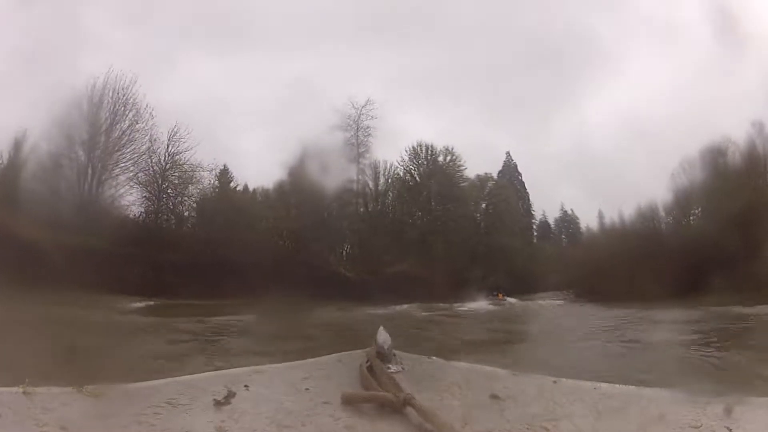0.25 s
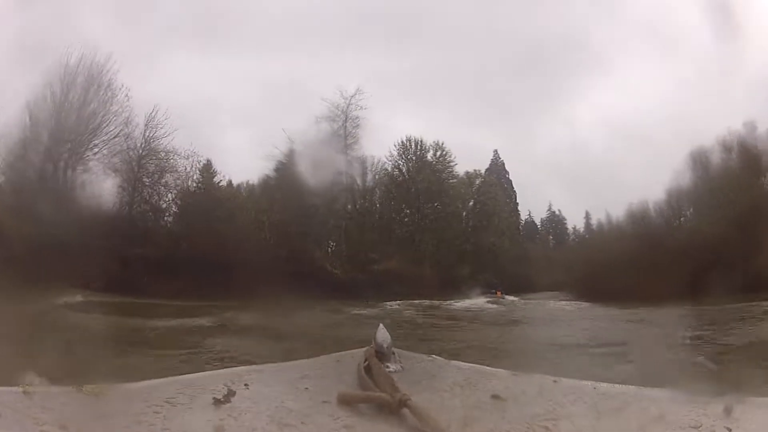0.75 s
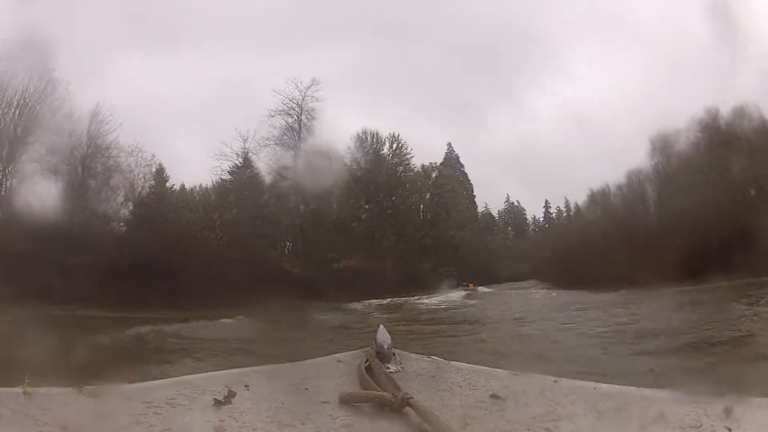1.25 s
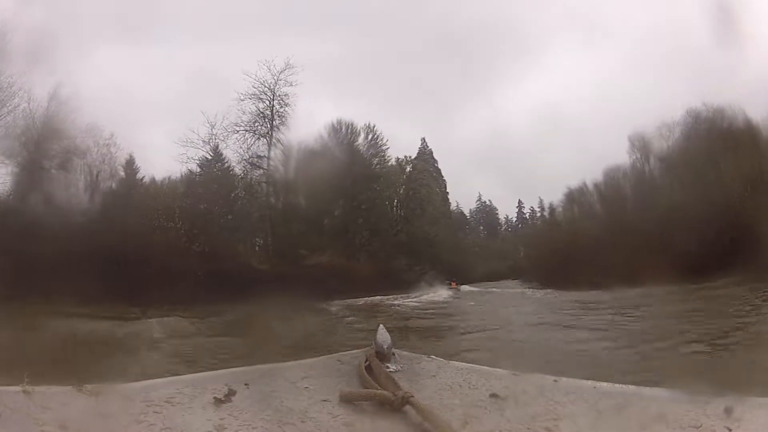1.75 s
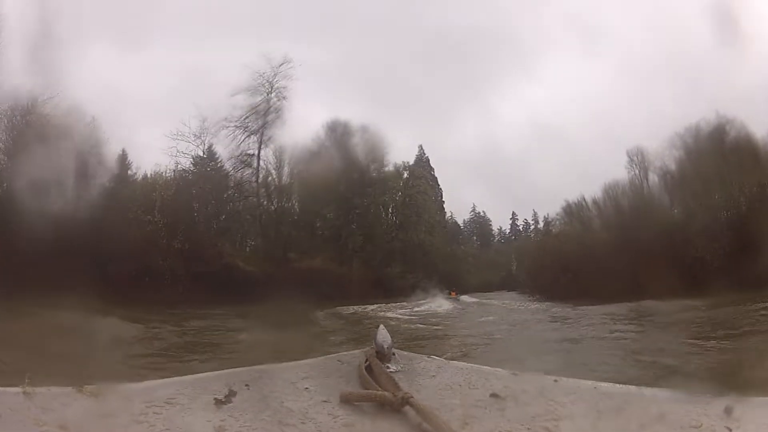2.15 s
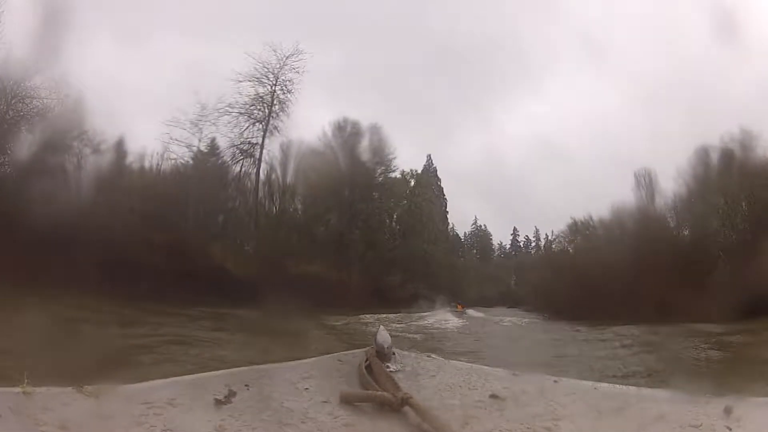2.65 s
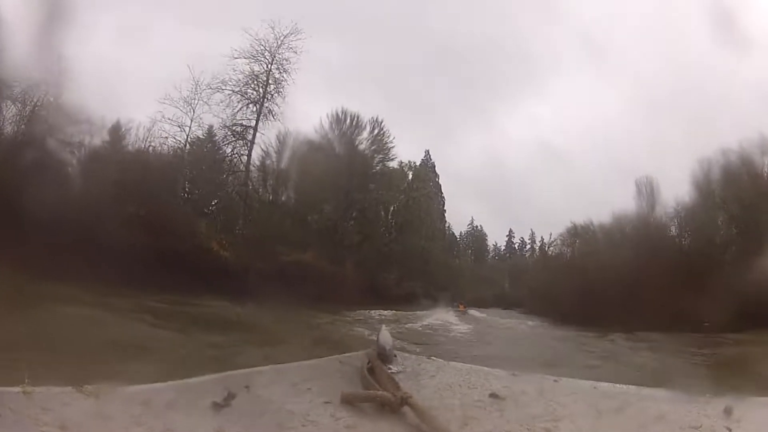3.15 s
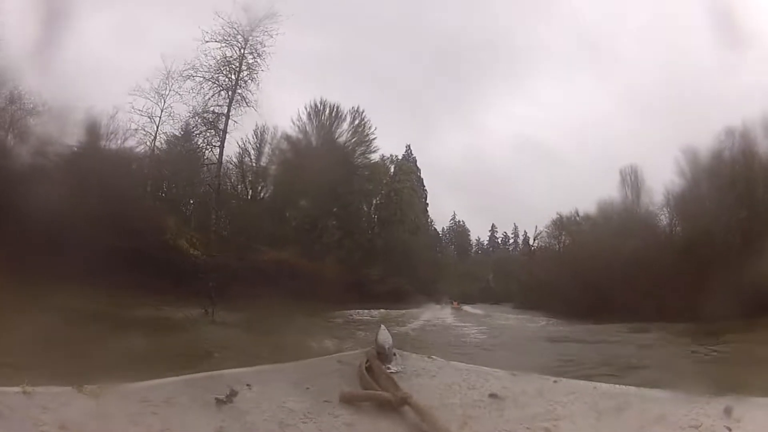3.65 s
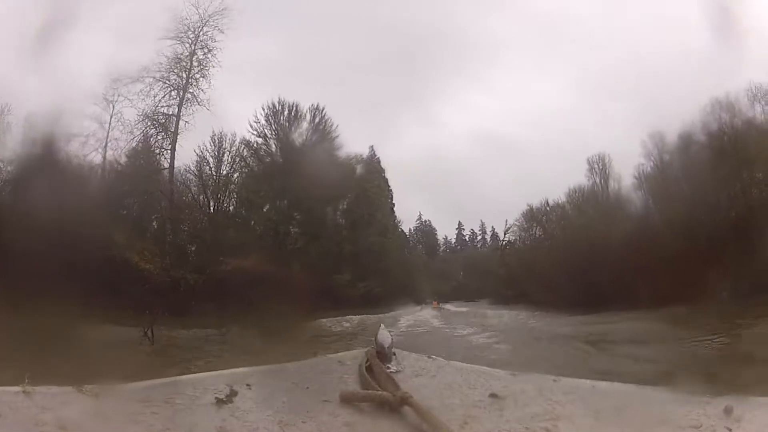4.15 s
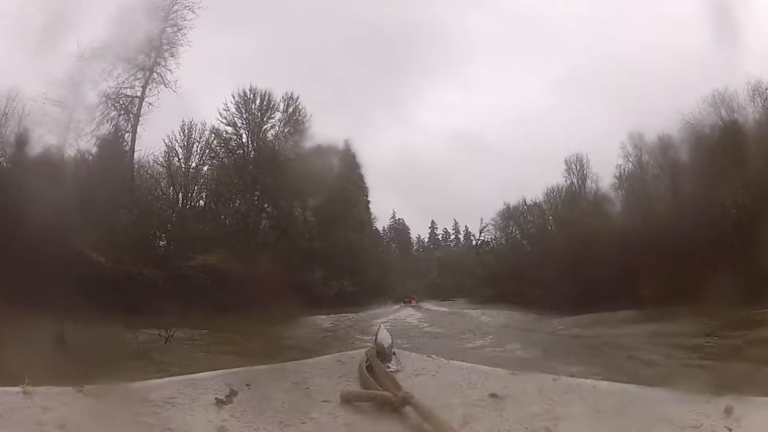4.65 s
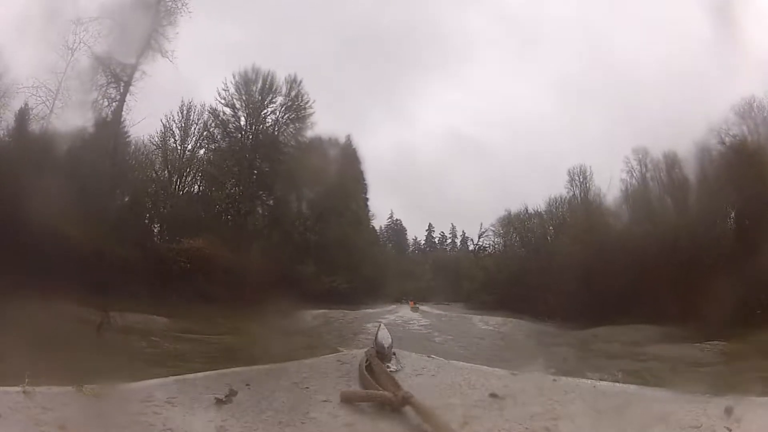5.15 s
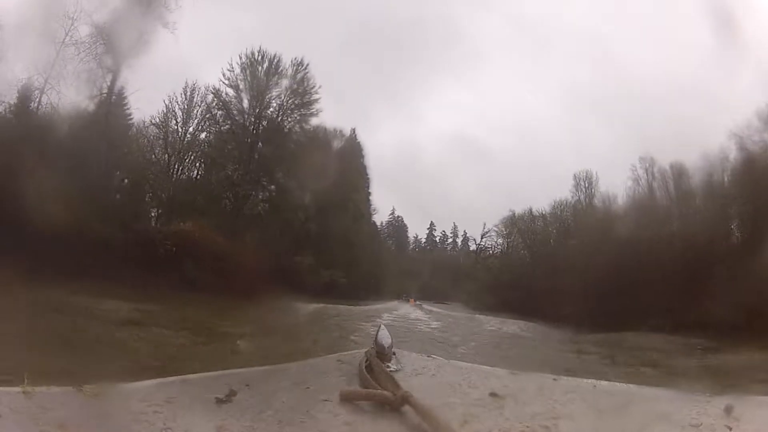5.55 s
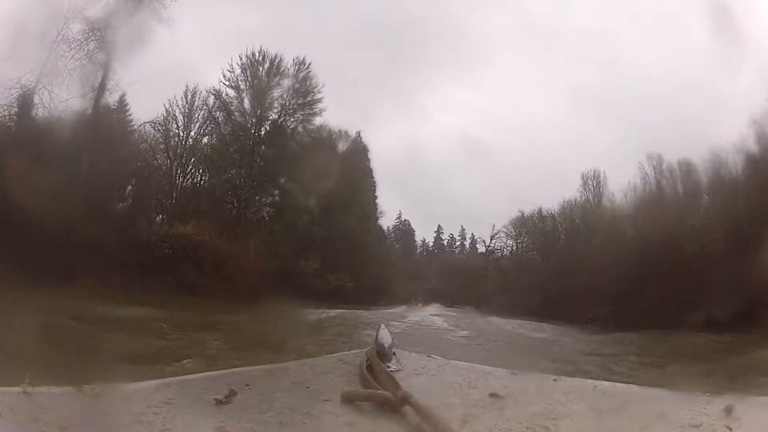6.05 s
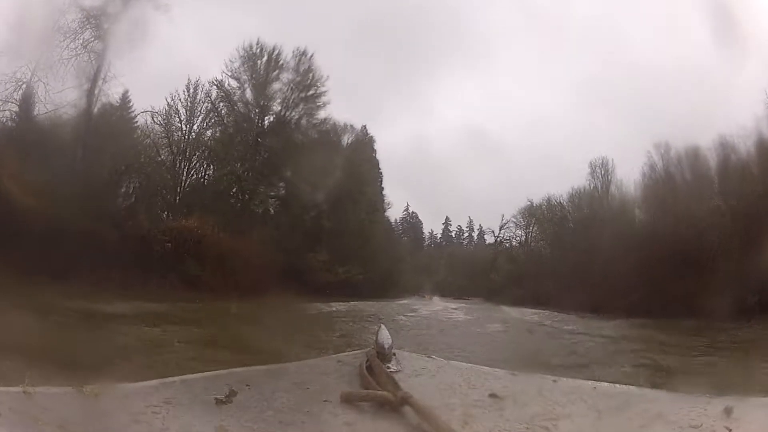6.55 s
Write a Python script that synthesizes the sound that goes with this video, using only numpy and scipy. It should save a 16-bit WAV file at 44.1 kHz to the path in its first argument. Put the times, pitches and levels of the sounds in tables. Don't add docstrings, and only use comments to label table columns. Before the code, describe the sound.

Close on the bow of a small motorboat on a river, a shut-in microphone picks up constant rushing spray and a humming engine. The note climbs, suddenly sags, rises into a steady hollow boom with a rattling loose part, then falls to lumpy throbbing with heavier hull thuds, starting to climb again at the end. Water drops tap the casing throughout.

```python
import sys
import numpy as np
from scipy import signal
from scipy.io import wavfile
from scipy.ndimage import uniform_filter1d

SR = 44100
rng = np.random.default_rng(int(sys.argv[2]) if len(sys.argv) > 2 else 0)


def amplitude_ratio(level_db):
    exponent = np.asarray(level_db, float) / 20
    return 10 ** exponent


def wav_out(sig):
    wavfile.write(sys.argv[1], SR, np.round(np.clip(np.atleast_2d(sig).T, -1, 1) * 32767).astype(np.int16))


N = 299439
TIME = np.arange(N) / SR

# t/s, shaft speed f/Hz, effort level/dB
THROTTLE = [(0.0, 50.65, -3), (0.45, 62.93, -1), (1.3, 65.33, -5), (1.44, 68.85, 0), (1.62, 83, 0.5),
            (1.77, 85.6, -10), (1.92, 35.83, -21), (2.32, 55.6, -6), (2.74, 66.9, 1), (3.18, 68.4, 3),
            (3.54, 66.46, -0.5), (4.3, 66.82, 2), (4.5, 63.47, 0), (5.25, 61.95, 3), (5.53, 30.14, 11),
            (5.93, 27.1, 6), (6.08, 33.3, 2), (6.79, 45.75, 5.5)]
# multiple of shaft speed, level/dB, waver/dB
MAIN_ORDERS = [(3, -0.44, 2.2), (4, -8, 2.5)]
# f/Hz, level/dB
BOOM = [(160, -38), (187, -35), (195, -23), (204, -11.5), (216, -17.5), (232, -20.5), (246, -21),
        (265, -37)]
# shaft speed f/Hz, level/dB
SHAFT = [(28, -17.5), (35, -29.5), (55, -38.5), (64, -33.5), (86, -47)]
PICK_UP = 6.03, 0.2, 6, 0.6, -16


def throttle():
    speed, effort_db = columns(THROTTLE)
    glide_s = 0.034
    speed = uniform_filter1d(speed, int(glide_s * SR))
    coast_db_per_hz_s = 0.23
    effort_db = effort_db + coast_db_per_hz_s * np.minimum(np.gradient(speed) * SR, 0)
    orders_db = [effort_db + db + read(BOOM, k * speed) for k, db, _ in MAIN_ORDERS]
    yield_db = 1.26 * np.maximum(orders_db[0] + 21, 0)
    shaft_db = read(SHAFT, speed) - np.minimum(yield_db, 10.5)
    start, swell, end, fade, top_db = PICK_UP
    not_yet_db = 30 * np.maximum(1 - (TIME - start) / swell, 0)
    gone_db = 10 * np.maximum((TIME - end) / fade, 0)
    pick_up_db = top_db - not_yet_db - gone_db
    return speed, effort_db, [shaft_db, *orders_db, pick_up_db]


# multiple of shaft speed, level/dB
SIDE_ORDERS = [(1.5, -76), (2, -44), (3.5, -56), (5, -39), (6, -39), (7, -41), (8, -40.5), (9, -40),
               (10, -44)]
# f/Hz, level/dB
CARRY = [(60, -2), (170, -5), (210, 6.5), (260, -1), (290, -8.5), (350, -11), (420, -17), (480, -1),
         (620, 0), (800, -31)]


def engine(turns, speed, effort_db, levels_db):
    wavers_db = [1.2] + [waver for *_, waver in MAIN_ORDERS] + [1.5]
    main = 0
    for k, db, waver in zip((1, 3, 4, 6), levels_db, wavers_db):
        main = main + amplitude_ratio(db + waver * drift(15)) * np.sin(2 * np.pi * k * turns)
    weak = 0
    for k, db in SIDE_ORDERS:
        level_db = db + read(CARRY, k * speed) + 2.5 * drift(12)
        weak = weak + amplitude_ratio(level_db) * np.sin(2 * np.pi * (k * turns + rng.random()))
    change_hz_s = abs(uniform_filter1d(np.gradient(speed) * SR, size=4000))
    blur_db = np.minimum(0.033 * change_hz_s, 12)
    return np.sqrt(2) * (main + amplitude_ratio(effort_db - blur_db) * weak)


# t/s, level/dB, ring f/Hz
THROBS = [(1.933, -7, 206.5), (1.995, -7, 225.5), (2.067, -7, 236), (2.104, -4, 240), (2.186, -14, 184),
          (5.354, -16, 246), (5.4, -0.5, 229), (5.468, -11, 215.4), (5.51, -3, 224.8), (5.555, 2, 218),
          (5.656, -3, 235), (5.724, 10, 235), (5.77, 8.5, 243), (5.855, 2.5, 220), (5.892, -19, 251.5),
          (5.954, -19, 210), (6.07, 7.5, 211), (6.104, 9.5, 216.8), (6.147, 4, 216.2), (6.189, 3, 210),
          (6.228, -4, 213), (6.27, -8, 228.8), (6.32, 7, 226), (6.388, 6.5, 228.2), (6.461, 1.5, 227),
          (6.499, 1, 241), (6.538, 0, 238.3), (6.595, 0, 255.7), (6.647, -6.5, 250), (6.756, -13, 222)]


def throbs():
    return rings(THROBS, lead=0.01244, length=0.052, gain_db=-8.5)


# f/Hz, width/Hz, level/dB
PANELS = [(168, 21, -35), (199.6, 14.4, 0), (226, 13.4, 4), (250, 25.8, -5), (329.7, 7.9, -10)]


def hull(turns, shake_db, thud_db):
    strength = amplitude_ratio(3.3 * rng.standard_normal(500))[turns.astype(int)]
    blows = (1.05 + strength * np.exp(-(turns % 1) / 0.94)) * rng.standard_normal(N)
    panels = 0
    for k, (hz, width, db) in enumerate(PANELS):
        ring = resonate(resonate(blows, hz, width), hz, 2.4 * width)
        panels = panels + (-1) ** k * amplitude_ratio(db) * ring
    thud = evened(band(blows, 75, 209))
    thud += amplitude_ratio(-11.5) * evened(band(blows, 2.5, 55))
    thud += evened(band(blows, 382, 1270))
    thud += amplitude_ratio(-1.5) * evened(resonate(blows, 734, 37))
    thud += amplitude_ratio(-13.5) * evened(resonate(blows, 595, 16))
    return amplitude_ratio(shake_db + 2.0) * evened(panels) + amplitude_ratio(thud_db - 4.27) * thud


# t/s, level/dB, length/s
SLAMS = [(0.0, -30, 0.04), (1.442, -29, .04), (1.987, -50, 0.011), (2.116, -23.5, 0.049),
         (2.243, -33, 0.065), (3.04, -36, 0.045), (3.21, -42, 0.056), (3.4, -29, 0.034), (3.95, -45, 0.088),
         (5.282, -32, 0.034), (5.607, -27, 0.05), (5.43, -56, 0.029), (5.77, -20, 0.038),
         (5.919, -20, 0.034), (6.56, -24, 0.031)]


def chop(chop_db):
    slams = sum(amplitude_ratio(db) * np.exp(-((TIME - s) / length) ** 2) for s, db, length in SLAMS)
    thud = amplitude_ratio(chop_db - 8 + drift(6.9)) + slams
    return chop_db + drift(7.9), 20 * np.log10(thud)


# f/Hz, level/dB per Hz
RUSH = [(280, -8), (330, -32.5), (420, -33), (500, -20), (650, -16), (980, -5), (1300, -10.5),
        (1450, -20.5), (1870, 3.5), (2250, -3), (2500, -12.5), (2950, -32), (4150, -43), (5900, -33.5)]
# f/Hz, width/Hz, level/dB
CASE = [(702, 18, 5.5), (737, 69, 7), (1016, 40.4, 12.5), (1143, 66, 6), (1790, 290, 6), (1910, 170, -3.5),
        (2190, 154, -10.5), (3510, 385, 15), (3792, 295, 17)]


def water(rush_db):
    flicker_db = 1.02 * drift(81) + 1.0 * drift(520) + 0.29 * drift(49)
    spray = rng.standard_normal(N) * amplitude_ratio(flicker_db)
    hz, _, z = signal.stft(spray, SR, nperseg=1024, noverlap=768)
    colour_db = read(RUSH, hz) - 30 * (hz < 270)
    for f0, width, db in CASE:
        colour_db = colour_db + db / (1 + (2 * (hz - f0) / width) ** 2)
    patches = uniform_filter1d(rng.standard_normal(z.shape), 10, 0)
    patches = evened(uniform_filter1d(patches, 10, 1))
    coloured = z * amplitude_ratio(colour_db[:, None] + 0.67 * patches)
    rush = signal.istft(coloured, SR, nperseg=1024, noverlap=768)[1][:N]
    return amplitude_ratio(rush_db + 2.8) * evened(rush)


# t/s, level/dB, ring f/Hz
DROPS = [(0.0348, -10, 1736), (0.4783, -9, 1870), (0.8684, -3.5, 1854), (1.111, -8, 1918),
         (1.2858, -18, 1880), (1.505, -3, 1850), (1.6724, -1.5, 1890), (1.9823, -12.5, 1784),
         (2.1266, -2, 1835), (2.2023, -7, 1796), (2.3665, -1, 1877), (2.4074, -2, 1910),
         (2.7342, -16, 1876), (2.8429, -11, 1910), (3.6805, -2.5, 1750), (3.802, -12, 1973),
         (4.0353, -5, 1790), (4.5025, -3.5, 1780), (5.081, -6, 1790), (5.5648, -1.5, 1810),
         (5.6406, -4, 1850), (6.333, -3, 1870), (6.4122, 0, 1753), (6.5605, -0.5, 1800)]


def drops():
    return rings(DROPS, lead=0.001647, length=0.0081, gain_db=-2.5)


# t/s, level/dB
TICKS = [(0.4437, -28), (0.7836, -26.5), (0.8977, -27), (0.9927, -30), (1.3326, -30), (2.5288, -29),
         (2.7427, -26), (2.788, -29), (2.9077, -26), (2.922, -22), (2.9956, -23.5), (3.009, -22.5),
         (3.0241, -18), (3.0976, -22.5), (3.1128, -24), (3.1268, -22), (3.142, -19), (3.1871, -27),
         (3.2163, -18.5), (3.2309, -27), (3.4254, -23), (3.4556, -22), (3.4702, -22), (3.6666, -18),
         (3.7431, -22.5), (4.2384, -22), (4.2992, -22), (4.548, -25), (5.7616, -20), (6.1377, -25),
         (0.0229, -33), (0.3541, -44), (0.3868, -34), (0.9461, -37), (1.1169, -33), (1.3478, -33),
           (1.4298, -36), (1.4583, -35), (1.5561, -33), (1.5816, -30), (1.5935, -31), (2.1117, -42),
           (4.5015, -32), (4.8048, -36), (5.0954, -33), (5.2859, -40), (5.4049, -35), (5.6755, -27),
           (5.7807, -20), (5.8561, -31), (5.8919, -26), (5.9257, -24), (6.0965, -25), (6.2057, -31),
           (6.3269, -31)]


def rattle(turns, boom_db):
    s, db = np.transpose(TICKS)
    hits = np.zeros(N)
    hits[((s - 0.0003) * SR).astype(int)] = amplitude_ratio(db + 29.5)
    each_turn = np.diff(np.floor(turns), prepend=0) > 0
    spread_db = 4 * np.minimum(rng.standard_normal(N), 1.5)
    hits += each_turn * amplitude_ratio(boom_db + 10 + spread_db)
    touch = np.roll(hits, -int(0.0024 * SR)) * amplitude_ratio(-8 + 2.5 * rng.standard_normal(N))
    hits = touch - hits
    each_firing = np.diff(np.floor(3 * turns), prepend=0) > 0
    hits += each_firing * amplitude_ratio(boom_db + 6.6 * rng.standard_normal(N))
    return band(hits, 2100, 4920)


def channel_noise():
    low = band(rng.standard_normal(N), 30, 270)
    high = band(rng.standard_normal(N), 830, 3800)
    return amplitude_ratio(-59) * evened(low + 0.13 * high)


def evened(x):
    return x / np.sqrt(np.mean(x ** 2) + 1e-20)


def columns(table):
    s, *rest = np.transpose(table)
    return [np.interp(TIME, s, c) for c in rest]


def read(points, hz):
    f, value = np.transpose(points)
    return np.interp(np.log(hz + 1), np.log(f), value)


def drift(hz):
    size = int(SR / hz)
    return evened(uniform_filter1d(uniform_filter1d(rng.standard_normal(N), size), size))


def resonate(x, hz, width):
    turn = np.exp(2j * np.pi * hz * TIME)
    r = np.exp(-np.pi * width / SR)
    return 2 * (turn * signal.lfilter([1 - r], [1, -r], x / turn)).real


def band(x, low_hz, high_hz):
    return signal.sosfilt(signal.butter(2, [low_hz, high_hz], "bandpass", fs=SR, output="sos"), x)


def rings(events, lead, length, gain_db):
    out = np.zeros(N + SR)
    t = np.arange(int(length * SR)) / SR
    for s, db, hz in events:
        tone = np.sin(2 * np.pi * hz * t) * np.hanning(len(t))
        out[round((s - lead) * SR):][:len(t)] += amplitude_ratio(db + gain_db) * tone
    return out[:N]


# t/s, rush of water level/dB, chop under the hull level/dB
RIDE = [(0.0, -15.5, -26.5), (0.5, -18.5, -28), (1.0, -22, -29), (1.35, -18.5, -38), (1.69, -17, -40),
        (1.75, -25, -33), (1.87, -27, -30), (2.0, -26.5, -22.5), (2.09, -17.5, -22), (2.45, -17, -30),
        (2.8, -19.5, -36.5), (4.2, -17.5, -35.5), (5.25, -18, -29.5), (5.45, -20.5, -21),
        (5.75, -17.5, -13.5), (6.0, -16, -14), (6.54, -18, -16.5), (6.79, -17.5, -21.5)]


def scene():
    speed, effort_db, levels_db = throttle()
    turns = np.cumsum(speed * (1 + 0.004 * drift(16))) / SR
    rush_db, chop_db = columns(RIDE)
    mono = engine(turns, speed, effort_db, levels_db) + throbs()
    mono += hull(turns, *chop(chop_db))
    mono += water(rush_db + 1.71 * drift(2.7)) + drops()
    mono += rattle(turns, boom_db=levels_db[1])
    apart = channel_noise()
    return np.array([mono + apart, mono - apart])


def low_pass(x):
    return signal.sosfilt(signal.butter(12, 15670, fs=SR, output="sos"), x)


# t/s, depth level/dB, recovery/s
DUCKS = [(2.385, 4, 0.057), (3.591, 5.5, 0.056), (4.89, 6, 0.058), (5.42, 4, 0.052), (6.568, 5.5, 0.08)]


def record(dry):
    duck_db = sum(depth * np.exp(-np.maximum(TIME - s, 0) / back) * (TIME > s) for s, depth, back in DUCKS)
    peak_db = 20 * np.log10(abs(dry[0]) + 1e-9)
    recovery_db = 90 * TIME
    over_db = np.maximum(np.maximum.accumulate(peak_db + recovery_db) - recovery_db + 6.0, 0)
    duck_db = duck_db + 0.5 * np.roll(uniform_filter1d(over_db, size=40), int(0.00046 * SR))
    anti_alias = signal.cheby1(7, 0.5, 5450, fs=SR, output="sos")
    smooth = signal.sosfilt(anti_alias, dry * amplitude_ratio(-duck_db))
    held = np.repeat(signal.resample_poly(smooth, 40, 147, axis=1), 4, axis=1)
    back = signal.resample_poly(held, 147, 160, axis=1)[:, :N]
    back = np.clip(back, -1, 1)
    below = signal.oaconvolve(back, signal.firwin(801, 15230, fs=SR)[None], "same")
    mix = below + amplitude_ratio(-24) * (back - below)
    return low_pass(np.clip(mix, -1, 1))


dry = scene()
out = record(dry)
wav_out(out)
```